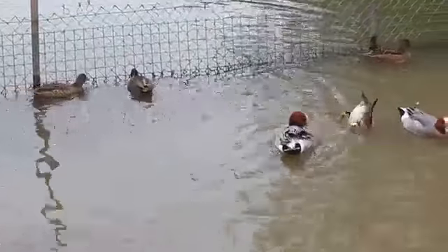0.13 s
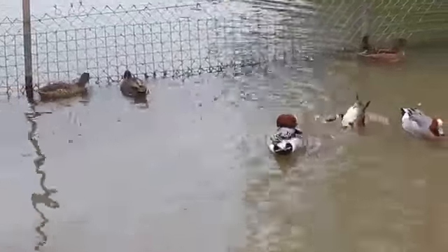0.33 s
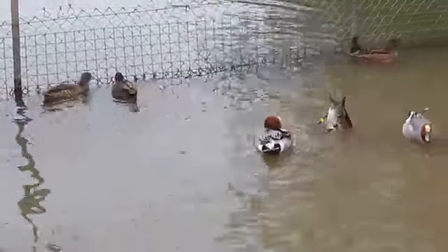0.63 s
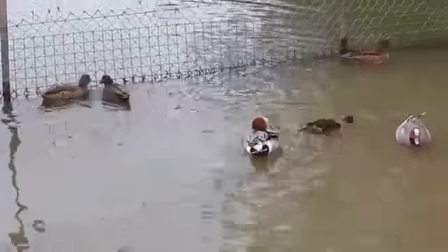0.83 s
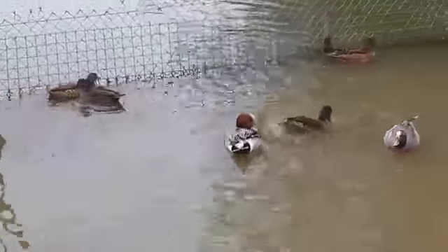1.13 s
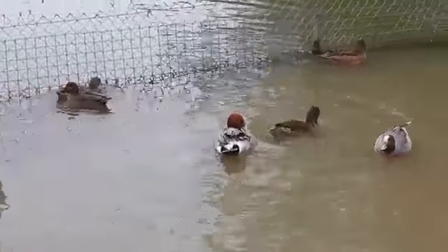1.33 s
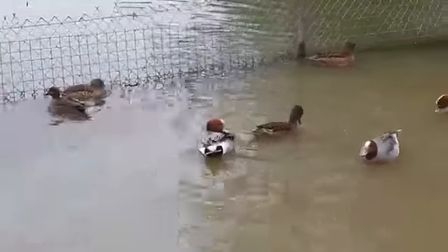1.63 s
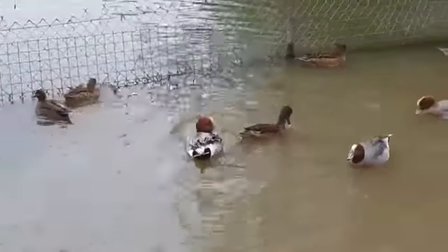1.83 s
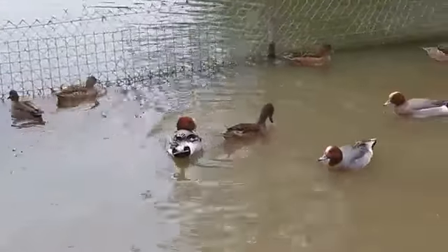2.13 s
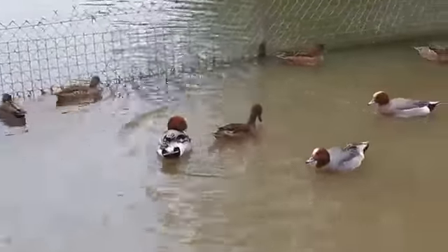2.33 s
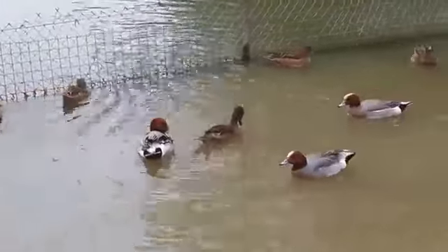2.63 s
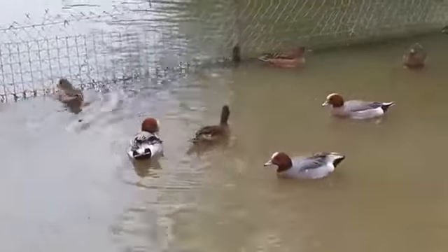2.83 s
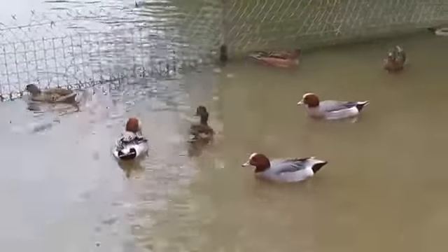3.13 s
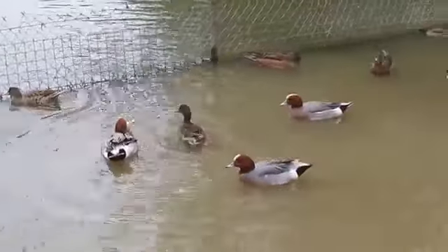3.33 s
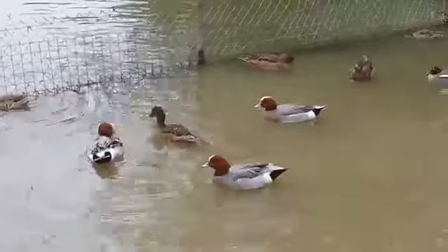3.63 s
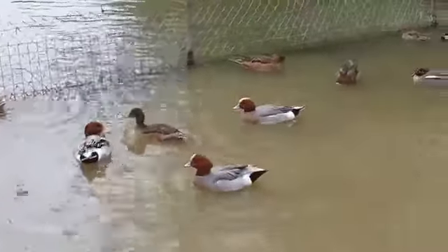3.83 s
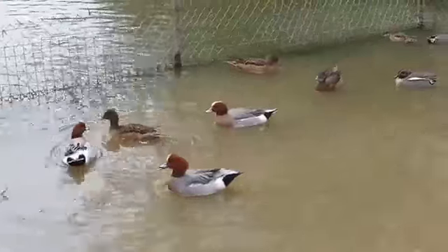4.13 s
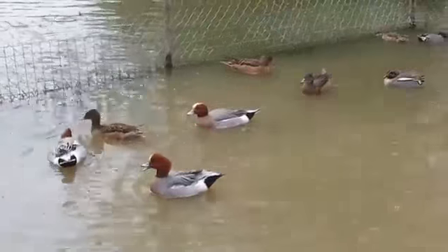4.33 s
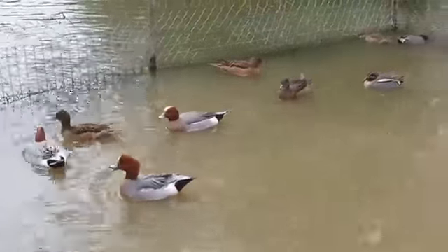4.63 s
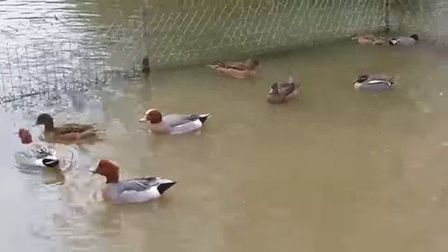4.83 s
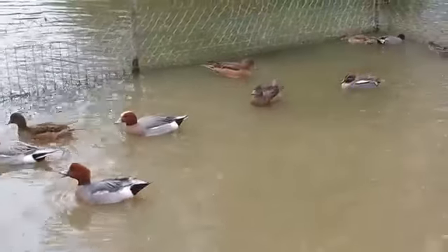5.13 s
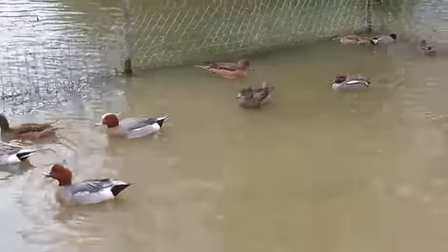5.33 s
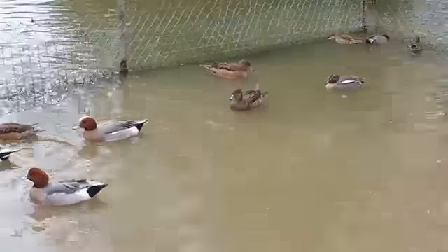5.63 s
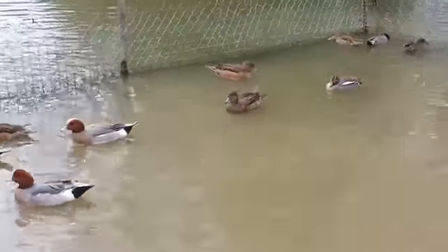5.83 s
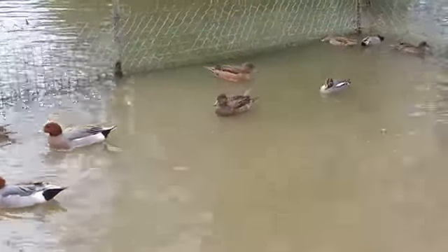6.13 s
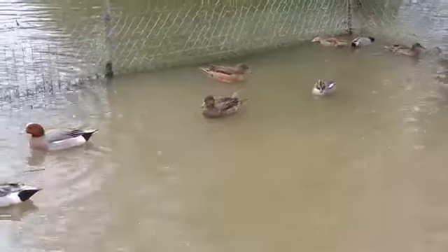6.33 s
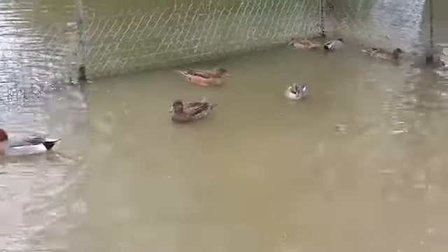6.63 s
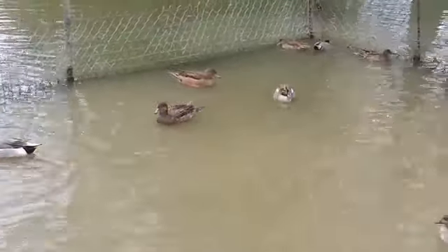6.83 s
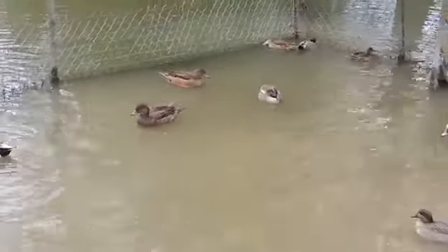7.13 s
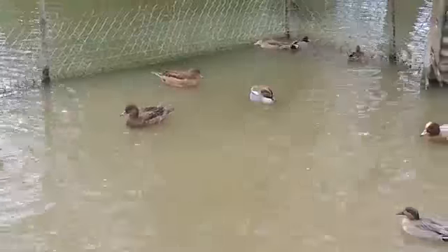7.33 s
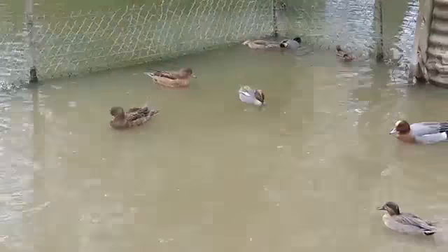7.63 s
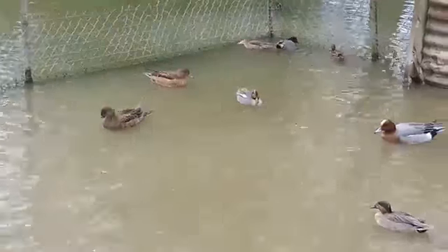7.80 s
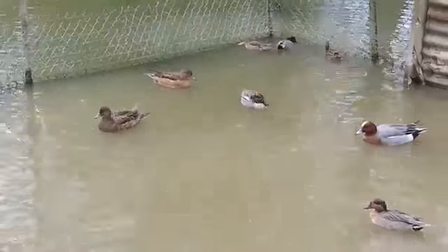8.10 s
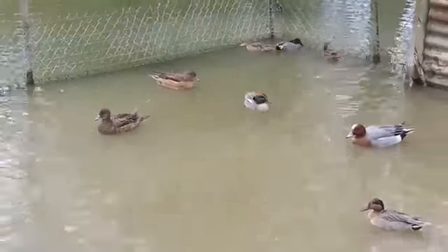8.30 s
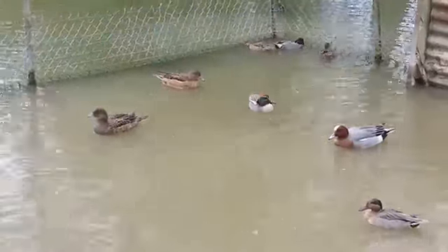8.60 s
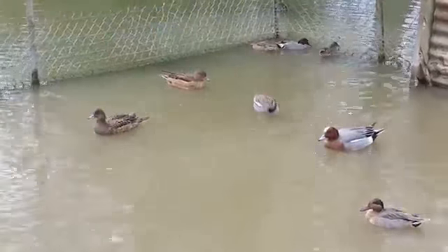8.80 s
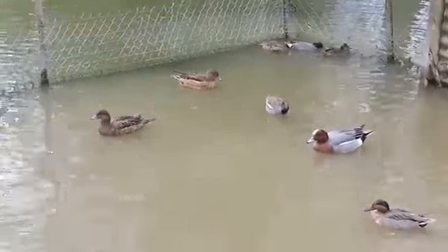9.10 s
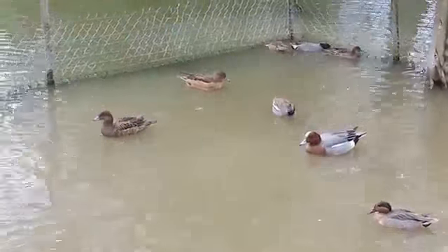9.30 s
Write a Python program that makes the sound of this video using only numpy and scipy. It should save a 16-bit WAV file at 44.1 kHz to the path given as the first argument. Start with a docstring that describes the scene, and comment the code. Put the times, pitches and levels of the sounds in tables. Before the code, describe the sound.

Outdoor pond ambience with soft hiss, hoarse duck grunts, one loud falling drake whistle around five seconds, and increasingly bright songbird phrases.

```python
"""Ducks on a shallow fenced pond, heard by a hand-held camera with two microphone ports, over noise hiss, leaves and traffic.
A dove coos in gliding tones and far birds twitter; ducks grunt in pulsed noise and a drake whistles up and down through a windpipe.
On the right a songbird sings gliding sine notes and a quick trill; water ticks in bright noise; then ducks growl in slow slaps.
A smaller bird chirps on the left, ducks whine upward in partials and a louder whistle breaks downward twice.
Later the songbird adds buzzing notes and quick falling sweeps; splashes plop as ringing air pockets. Banks and trees echo the animals."""
import sys
import numpy as np
from scipy import signal
from scipy.fft import rfft, irfft, next_fast_len
from scipy.io import wavfile
from scipy.ndimage import uniform_filter1d, map_coordinates

SR = 44100
rng = np.random.default_rng(int(sys.argv[2]) if len(sys.argv) > 2 else 0)


def master(y):
    """Save y as 16-bit WAV."""
    cut = np.clip(np.atleast_2d(y).T, -1, 1)
    pcm = np.round(cut * 32767)  # scale
    wavfile.write(sys.argv[1], SR, pcm.astype(np.int16))


N = 417186  # samples

# Levels in all tables are settings ahead of flutter and later gains.
# hiss and leaves, spectrum before levelling: (f/Hz, density/dB per Hz)
HISS_SPECTRUM = [(12, -58), (20, -8), (43, -24), (131, -7.5), (333, -0.5), (427, -0.5), (665, -3),
                 (925, -3.5), (1560, -5), (3880, -8.5), (4340, -8), (5870, -16.5), (10500, -13.5),
                 (13400, -15), (14600, -15)]
# mid-band blur of far birds and the whistle's echo, spectrum before levelling: (f/Hz, density/dB per Hz)
BLUR_SPECTRUM = [(600, -81), (1200, -18.5), (2000, -7.5), (3200, 3.5), (4600, -4.5), (5600, -6),
                 (6500, -20), (8000, -90)]
# background beds: (t/s, hiss level/dB, traffic level/dB, level of far birds and whistle echo/dB)
BED_LEVELS = [(0.0, -64.5, -65, -88), (0.58, -63, -63, -62), (0.81, -60, -68.5, -54),
              (2.63, -63.5, -62.5, -73), (4.19, -61.5, -69, -62), (5.13, -57.5, -96, -43),
              (5.29, -60, -106, -50.5), (6.9, -61, -68, -55), (8.9, -59.5, -96, -51), (9.46, -58, -80, -47)]
# likeness of left and right in the beds: (f/Hz, correlation)
STEREO_LIKENESS = [(60, -0.16), (290, 0.25), (640, 0.16), (1400, -0.34), (3000, 0.058)]
# decay of the echoes from banks and trees: (f/Hz, t60/s)
ECHO_DECAY = [(300, 0.14), (1500, 0.83), (3000, 0.5), (6000, 0.53), (12000, 0.36)]
# dove coos: (t/s, length/s, start f/Hz, end f/Hz, middle level/dB)
DOVE_COOS = [(0, 0.32, 475, 456, -71), (.84, .17, 439, 459, -59.5), (1.45, 0.36, 501, 460.6, -64.5),
             (1.98, 0.2, 483, 443, -63), (2.58, 0.15, 440, 433, -64.5), (2.94, 0.12, 416, 393, -68),
             (4.05, 0.16, 479, 476, -64.5), (4.28, 0.24, 477, 458, -62), (6.3, 0.12, 434, 433, -65)]
# duck grunts: (t/s, peak level/dB, length/s, bright part level/dB)
DUCK_GRUNTS = [(0.593, -45.5, 0.049, -6.5), (1.782, -51, 0.036, -9), (2.383, -49, 0.034, -8.5),
               (2.654, -50.5, 0.064, -13), (3.756, -43.5, 0.047, -15), (4.552, -37, 0.053, -7.5),
               (4.824, -33.5, 0.069, -7), (5.783, -41.5, 0.067, -8.5), (6.029, -45.5, 0.056, -7),
               (6.497, -36.5, 0.031, -19), (6.568, -49, 0.01, -19), (6.606, -45, 0.0089, -21),
               (7.315, -48, .015, -9), (7.477, -46.5, .012, 0), (7.794, -41.5, 0.046, -9),
               (7.86, -48.5, 0.079, -20), (8.156, -48.5, 0.027, -1), (8.297, -50, .015, 5),
               (8.333, -43.5, 0.088, -0.5), (8.878, -44, 0.031, -8), (9.272, -35.5, 0.054, -19.5),
               (9.38, -37.5, 0.015, 7), (9.384, -45, 0.018, 3), (9.417, -43, 0.036, -21)]
# resonances of throat, open bill and body: (f/Hz, width/Hz, level per pass/dB), passed twice
THROAT_MODES = [(520, 704, 1.5), (960, 550, 3.5), (1277, 235, 0.5)]
BILL_MODES = [(1378, 214, 1), (2300, 1360, -2.5)]
CHEST_MODES = [(244, 130, -4.5)]
# single gliding partials of duck whines, grunts and quacks, one list each: (t/s, f/Hz, level/dB)
DUCK_PARTIALS = [
    [(4.85, 1637, -42), (4.862, 1714, -44), (4.88, 1740, -43), (4.901, 1780, -35)],
    [(4.83, 414, -49.5), (4.869, 491, -41), (4.884, 550, -53)],
    [(8.326, 1560, -56), (8.344, 1590, -49), (8.41, 1430, -55), (8.43, 1350, -62)],
    [(.597, 960, -56), (.62, 987, -52), (.65, 995, -60)],
    [(8.487, 557, -63), (8.502, 540.0, -49), (8.52, 520.0, -54.5)],
]
# drake whistles, the louder breaking downward twice: (t/s, f/Hz, effort level/dB)
DRAKE_WHISTLES = [
    [(.7, 1154, -57), (.718, 1420, -54), (.743, 2590, -43), (.755, 2800, -41), (.779, 2880, -36),
     (.829, 2760, -38), (.865, 2560, -39), (.904, 1990, -46), (.961, 1290, -56), (1.03, 1120, -60),
     (1.099, 830, -60)],
    [(4.89, 960, -36), (4.92, 1246, -31), (4.936, 2050, -22), (4.945, 2610, -22), (4.969, 2850, -18),
     (4.999, 2820, -16), (5.035, 2670, -19), (5.069, 2550, -19), (5.075, 2200, -25), (5.138, 1790, -25),
     (5.145, 1450, -29), (5.2, 1185, -32), (5.25, 938, -44), (5.301, 778, -52), (5.4, 670, -48)],
]
# each whistler: (left port lag/us, pan/dB, echo level/dB, wall level/dB, octave partial level/dB, rasp/dB)
DRAKE_PLACES = [(-260, 11, 0, -1.5, -10, 2), (77.5, -3.5, -10.5, -4, -7.5, 2)]
# a drake's windpipe colours each partial that glides through it: (f/Hz, level/dB)
WINDPIPE_COLOUR = [(500, -9), (1000, -7), (1230, -3.5), (1450, -8.5), (1800, 0), (2250, -8.5), (2550, -1.5),
                   (2850, 1), (3200, -5), (3600, -2.5), (4150, 12), (4600, 3.5), (5000, -4.5),
                   (5700, -11.5)]
# air in a whistle, spectrum before levelling: (f/Hz, density/dB per Hz)
BREATH_SPECTRUM = [(250, -90), (700, -24), (1500, -29), (2800, 6), (4500, -5), (6000, -13), (7500, -11),
                   (10000, -14), (11500, -31), (14000, -42)]
# songbird notes: (t/s, glide/s, tail/s, start f/Hz, turn f/Hz, end f/Hz, turn level/dB, swell to turn/dB)
SONG_NOTES = [(1.356, 0.068, 0.043, 3300, 2170, 3020, -63, -2),
              (1.667, .02, 0.027, 2660, 3580, 2350, -47.5, 6),
              (1.952, .02, .012, 3260, 3190, 3150, -55, 14), (1.996, 0.03, .04, 3420, 3620, 3080, -58, 1),
              (2.302, 0.032, 0.024, 3740, 3190, 3120, -52, 13),
              (2.562, 0.061, 0.13, 2690, 2766, 2860, -64.5, -4),
              (3.072, 0.014, 0.05, 4100, 4400, 4290, -56, 4),
              (3.166, 0.034, 0.11, 5300, 4200, 3170, -52, 15),
              (3.374, .01, 0.024, 3070, 3060, 2550, -53, 1),
              (3.426, 0.036, .088, 2680, 2680, 2760, -59.5, 9),
              (3.768, .006, 0.026, 3220, 3140, 2810, -57.5, 6),
              (3.878, .03, .014, 2480, 2650, 2730, -60, 6),
              (3.936, 0.017, 0.058, 4335, 3680, 3550, -52, -4),
              (4.216, 0.012, 0.12, 4110, 3400, 2530, -52, -4),
              (4.353, 0.055, 0.081, 2920, 3200, 3220, -48.5, 4),
              (4.618, 0.014, 0.027, 4220, 4220, 4200, -42.5, -2),
              (4.666, 0.036, .054, 3820, 3550, 3930, -49.5, 1),
              (4.858, .014, .01, 4050, 4250, 4250, -41.5, -12),
              (5.277, .01, 0.039, 4230, 4270, 4510, -43.5, -7),
              (5.378, 0.015, 0.02, 5100, 5560, 5550, -50.5, 0),
              (5.508, .022, 0.07, 4730, 4470, 4295, -44, 6),
              (5.596, 0.019, .01, 4330, 3330, 3090, -63, -25),
              (5.69, 0.067, 0.014, 2640, 3220, 3250, -41, 20),
              (5.775, 0.034, .077, 3250, 3132, 3224, -42, 2),
              (5.952, 0.049, 0.074, 2870, 3170, 3104, -39, 10),
              (6.17, 0.16, 0.11, 2080, 2504, 2470, -59, -5.5),
              (6.276, .006, .03, 3700, 3800, 2550, -57, -1),
              (6.446, .006, .05, 3200, 3200, 3000, -61.5, -8),
              (6.71, .008, 0.034, 2360, 2450, 3530, -53, -4),
              (7.066, 0.0031, 0.027, 3360, 3500, 2120, -45, 0),
              (7.261, 0.015, 0.017, 3040, 3460, 3000, -47, 1),
              (7.401, 0.074, .004, 7330, 5500, 5300, -46, 11),
              (7.475, 0.012, 0.0086, 5270, 3940, 3850, -36, -1.5),
              (7.602, .014, 0.011, 3830, 2760, 2590, -52, 5),
              (7.642, 0.027, 0.022, 3180, 3670, 4000, -45, -2.5),
              (7.818, 0.0091, 0.011, 3260, 3320, 2850, -40.5, 2),
              (7.84, 0.0116, 0.052, 2830, 3650, 3840, -33, 16),
              (7.875, 0.0053, 0.072, 5530, 4800, 4757, -30, 27),
              (7.957, 0.042, 0.044, 3476, 3245, 3070, -30.5, 7),
              (8.127, 0.014, 0.022, 3333, 2994, 2250, -40, -5),
              (8.187, 0.02, .042, 2660, 3000, 2967, -37, 7),
              (8.288, 0.023, 0.0094, 4920, 4280, 4390, -38.5, -5.5),
              (8.318, 0.029, 0.02, 4400, 4540, 4600, -44, 32),
              (8.385, 0.023, 0.027, 4440, 3834, 3650, -31, 0),
              (8.565, .006, 0.011, 3190, 3400, 3050, -36, 4),
              (8.583, .014, 0.023, 3010, 3710, 3830, -27.5, 13),
              (8.613, 0.0069, 0.06, 5700, 4855, 4820, -30.5, 21),
              (8.701, .042, 0.042, 3510, 3280, 3030, -28.5, 7),
              (8.886, 0.019, .004, 3680, 3410, 3420, -32.5, 0.5),
              (8.904, 0.054, 0.03, 3370, 3665, 4100, -26.5, 9.5),
              (9.126, 0.019, 0.041, 4950, 4430, 4710, -36.5, -1),
              (9.321, .006, 0.011, 3560, 3620, 3290, -31.5, 5),
              (9.339, 0.041, 0.022, 3340, 3650, 3600, -22.5, 14.5),
              (9.433, .008, .016, 5570, 4420, 3640, -44, 1)]
# the camera turns: (t/s, left port lag behind right/us)
SONG_LAGS = [(0, 400), (6.2, 380), (7, 336), (9.46, 280)]
# thin ticks of water: (t/s, peak level/dB, pan/dB)
WATER_TICKS = [(1.5733, -47, -2), (2.2473, -46, 1), (5.8292, -44, -1), (7.1472, -49, 0.0),
               (7.3118, -45, -3), (7.7194, -44, -3), (9.3871, -43.5, -10)]
# the songbird's run of alike notes: (t/s, level/dB)
TRILL_TIMES = [(1.785, -58), (1.87, -58), (1.959, -57), (2.036, -57), (2.128, -56), (2.227, -55.5),
               (2.306, -55), (2.407, -57.5)]
# the shape they share: (glide/s, tail/s, start f/Hz, turn f/Hz, end f/Hz)
TRILL_SHAPE = (.016, .045, 2250, 2420, 2600)
# duck growls: (t/s, swell/s, fade/s, peak level/dB)
DUCK_GROWLS = [(3.29, 0.036, 0.061, -48.5), (3.34, 0.41, .15, -47.5), (3.94, 0.0091, .01, -52.5),
               (5.12, 0.086, 0.19, -47), (6.96, .03, 0.12, -59.5), (7.17, 0.053, 0.014, -55),
               (7.27, 0.049, 0.027, -57.5), (8.6, 0.061, .27, -52), (8.95, 0.12, .07, -46.5),
               (9.1, .27, .09, -45)]
# mostly falling chirps on the left: (t/s, glide/s, tail/s, start f/Hz, turn f/Hz, end f/Hz,
# turn level/dB, swell to turn/dB)
LEFT_CHIRPS = [(3.814, .012, 0.066, 5010, 4050, 4010, -60, -6),
               (4.172, 0.015, 0.047, 5870, 5420, 5620, -56, 1),
               (4.512, 0.011, 0.066, 5070, 3980, 3900, -49, -0.5),
               (4.88, .012, .03, 4780, 4720, 4710, -42, -1),
               (5.547, 0.014, 0.038, 6950, 5520, 5570, -47.5, 8.5),
               (5.893, 0.015, 0.055, 6900, 5630, 5630, -53, 8),
               (5.94, 0.016, .003, 5020, 3260, 3300, -54, -6),
               (6.24, .016, 0.084, 6200, 3950, 3890, -56, 6),
               (6.362, .008, 0.02, 4850, 4550, 4050, -54, 12),
               (6.604, .012, 0.082, 5120, 4700, 4530, -50.5, -1),
               (6.938, .024, .02, 6500, 5590, 5470, -59, 6),
               (6.985, 0.014, 0.014, 5400, 3800, 3400, -54.5, 1),
               (7.025, 0.022, 0.018, 3300, 3160, 3210, -41, 16),
               (7.216, 0.0077, .003, 5360, 4150, 4150, -51, -6),
               (7.294, 0.015, 0.041, 5100, 4610, 4650, -43.5, 2),
               (7.35, 0.0102, .022, 4670, 4440, 3980, -46.5, 6),
               (7.642, 0.018, 0.033, 4820, 3790, 3880, -44.5, 3),
               (7.766, 0.0086, .01, 4570, 4130, 3880, -51, -3), (8.0, 0.007, .03, 4960, 4670, 4760, -43, 2),
               (8.034, 0.014, 0.022, 4770, 4710, 4200, -40, 19),
               (8.726, .02, .004, 4970, 3750, 3650, -51, -10), (8.756, .01, 0.05, 4820, 4830, 4800, -50, 0),
               (9.062, .014, .034, 5020, 4620, 4700, -40, 9)]
# rising nasal whines, one list each: (t/s, f/Hz, effort level/dB)
DUCK_WHINES = [
    [(4.32, 448, -60), (4.362, 538, -53), (4.43, 604, -55), (4.545, 685, -54.5), (4.59, 696.5, -47),
     (4.629, 741, -49)],
    [(4.71, 520, -65.5), (4.773, 578, -46.5), (4.81, 658, -59), (4.839, 682, -46)],
]
# whine partials from the fundamental up: (level/dB)
WHINE_PARTIALS = [-1.5, 4.5, -0.5, 3]
# buzzing notes, and quick falling sweeps that open two song notes:
# (t/s, length/s, start f/Hz, end f/Hz, swing/Hz, swing rate/Hz, level/dB)
SWINGING_NOTES = [(7.264, 0.026, 3240, 3294, 280, 127, -44), (7.868, 0.0099, 8200, 5500, 300, 360, -50),
                  (8.608, 0.014, 8300, 5430, 300, 450, -54), (9.035, 0.025, 5220, 5750, 495, 184, -39)]
# air pockets ringing in a splash, one list each: (t/s, f/Hz, level/dB)
SPLASH_POCKETS = [
    [(9.38, 1430, -45), (9.39, 1350, -52)],
    [(9.388, 1054, -43), (9.402, 847, -41), (9.432, 800, -56)],
    [(9.39, 520, -47), (9.41, 414, -43.5)],
    [(9.394, 2300, -39), (9.406, 2180, -41)],
    [(9.41, 1660, -54), (9.43, 2150, -60)],
]

TOP_HZ = 14530  # the camera's band limit
SONG_FADE_DB, TRILL_FADE_DB, CHIRP_FADE_DB = 9.5, 10, 12  # drop over each note's tail
COO_EDGE_DB = 4  # softer at both ends
GROWL_RATE_HZ, GROWL_EDGE_DB, RASP_S = 42, 7, .012


def amp(db):
    """Decibels to a linear gain."""
    return 10 ** (np.asarray(db) / 20)


def unit(x):
    """Levels x to an rms of 1."""
    return x / np.sqrt(np.mean(x ** 2) + 1e-20)


def along(points, hz):
    """Reads (f/Hz, value) points on a log frequency axis."""
    f, v = np.transpose(points)
    return np.interp(np.log(hz + 1), np.log(f + 1), v)


def curves(rows, t):
    """Reads each column after the time at times t."""
    s, *cols = np.transpose(rows)
    return [np.interp(t, s, c) for c in cols]


def wobble(rate, size=N):
    """A smooth random curve with rate knots a second."""
    knots = rng.standard_normal(int(size * rate / SR) + 4)
    return map_coordinates(knots, [np.arange(size) * rate / SR])


def filtered(x, response):
    """Multiplies the spectrum of x by a complex response of frequency."""
    m = next_fast_len(N + SR // 2)
    return irfft(rfft(x, m) * response(np.fft.rfftfreq(m, 1 / SR)), m)[..., :N]


def resonant(x, modes):
    """Sends x twice through causal resonances, so that their skirts are steep."""
    def response(f):
        total = 0
        for k, (centre, width, db) in enumerate(modes):
            band = 1j * f * width / (centre * centre - f * f + 1j * f * width)
            total = total + (-1) ** k * amp(db) * band  # neighbours in opposite polarity
        return total ** 2
    return filtered(x, response)


def span(rows, fade):
    """Sample range, times and soft-edged gate of one call."""
    start, end = rows[0][0], rows[-1][0]
    i = np.arange(max(0, round((start - fade) * SR)), min(N, round((end + fade) * SR)))
    t = i / SR
    gate = np.clip(np.minimum(t - start, end - t) / fade + 1, 0, 1) ** 2
    return i, t, gate


def tones(calls, fade, flutter_db, flutter_rate, drift):
    """Gliding harmonic partials whose levels flutter and whose pitch drifts at random."""
    out = np.zeros(N)
    for rows in calls:
        i, t, gate = span(rows, fade)
        hz, *levels = curves(rows, t)
        phase = 2 * np.pi * np.cumsum(hz * (1 + drift * wobble(88.9, len(i)))) / SR
        stack = 0
        for k, db in enumerate(levels):
            gain = amp(db + flutter_db * wobble(flutter_rate, len(i)))
            stack = stack + gain * np.sin((k + 1) * phase)
        out[i] += np.sqrt(2) * gate * stack
    return out


def notes(table, fade_db):
    """Each note glides and swells to a turn, then tails off."""
    calls = []
    for s, glide, tail, start_hz, turn_hz, end_hz, db, swell_db in table:
        turn = s + glide
        calls.append([(s, start_hz, db - swell_db), (turn, turn_hz, db), (turn + tail, end_hz, db - fade_db)])
    return calls


def piped(rows, partials_db):
    """Effort plus the windpipe's colour gives the level of each partial, every 2 ms."""
    t = np.arange(rows[0][0], rows[-1][0], .002)
    hz, effort_db = curves(rows, t)
    levels = [effort_db + db + along(WINDPIPE_COLOUR, (k + 1) * hz) for k, db in enumerate(partials_db)]
    return np.transpose([t, hz] + levels)


def pulses(rate, jitter, scatter_db):
    """Vocal folds slap at an uneven rate, each slap of its own strength."""
    count = np.cumsum(rate * (1 + jitter * wobble(120)).clip(0)) / SR
    slap = np.diff(np.floor(count), prepend=0) > 0
    strength = amp(scatter_db * np.sin(2 * np.pi * rng.random(N)))
    return slap * strength * np.sqrt(SR / np.maximum(rate, 1))


def ports(x, lag_us, pan_db):
    """Places a source by arrival and level: positive lag delays the left port, positive pan favours it."""
    shifts = np.multiply.outer([-.5, .5], lag_us * np.ones(N)) * 1e-6 * SR
    pair = np.array([map_coordinates(x, [np.arange(N) + shift]) for shift in shifts])
    return pair * amp([[pan_db / 2], [-pan_db / 2]])


def echoes(x):
    """Banks and trees answer as a noise tail; each frequency dies at its own speed."""
    hz, t, z = signal.stft(rng.standard_normal((2, SR)), SR, nperseg=256)
    decay = amp(-60 * t / along(ECHO_DECAY, hz)[:, None])
    tail = signal.istft(z * decay, SR, nperseg=256)[1]
    late = np.pad(x, (400, 0))[None]  # about 9 ms before the first answer
    return signal.fftconvolve(late, tail / np.linalg.norm(tail[0]), axes=1)[:, :N]


def rush(spectrum, patchy_db):
    """Stereo noise of rms 1 with time-frequency patches of random gain."""
    z = signal.stft(rng.standard_normal((2, N)), nperseg=512)[2]
    field = uniform_filter1d(uniform_filter1d(rng.standard_normal(z.shape[1:]), 6, 0), 14, 1)
    pair = signal.istft(z * amp(patchy_db * unit(field)), nperseg=512)[1][:, :N]

    def mid_side(hz):
        turn = np.arccos(np.clip(along(STEREO_LIKENESS, hz), -1, 1)) / 2
        return amp(along(spectrum, hz)) * [np.cos(turn), np.sin(turn)]
    mid, side = filtered(pair, mid_side)
    return unit(np.array([mid + side, mid - side]))


def air():
    """Noise beds: hiss with leaves, traffic that swells, a mid-band blur of far birds and the whistle's echo."""
    hiss_db, traffic_db, blur_db = curves(BED_LEVELS, np.arange(N) / SR)
    # (f/Hz, density/dB per Hz)
    traffic_spectrum = [(20, -37), (60, -14), (130, -10.5), (300, -15), (600, -58), (900, -93)]
    traffic = amp(traffic_db - 3 + 1.7 * wobble(3.25)) * rush(traffic_spectrum, patchy_db=1.0)
    blur = amp(blur_db - 2 + 1.5 * wobble(7.3)) * rush(BLUR_SPECTRUM, patchy_db=3.0)
    hiss = amp(hiss_db + 7.5 + 0.17 * wobble(11)) * rush(HISS_SPECTRUM, patchy_db=2.0)
    return hiss + traffic + blur


def twitter(count):
    """Faint far birds: short sine glides at chance times and pitches, from either side, wet with echo."""
    sides = [[], []]
    for when, pitch, glide, length, loud, side in rng.random((count, 6)):
        s, hz, db = when * (N / SR - .1), 2600 * 2 ** pitch, -77 + 4 * loud
        end = s + 0.0204 + .06 * length
        sides[int(side >= .5)].append([(s, hz, db), (end, hz * (.72 + 0.44 * glide), db - 2)])
    left, right = (tones(calls, .005, flutter_db=5.0, flutter_rate=126, drift=0.007) for calls in sides)
    return ports(left, -200, 1.5) + ports(right, 240, -1.5) + echoes(amp(7.5) * (left + right))


def dove():
    """Low gliding sine coos that swell to the middle and soften again."""
    coos = []
    for s, length, start_hz, end_hz, db in DOVE_COOS:
        middle = (s + length / 2, (start_hz + end_hz) / 2, db)
        coos.append([(s, start_hz, db - COO_EDGE_DB), middle, (s + length, end_hz, db - COO_EDGE_DB)])
    return tones(coos, 0.044, flutter_db=-0.5, flutter_rate=26.5, drift=0.0074)


def grunts():
    """Short hoarse bursts of fast uneven slaps and breath; a wider bill adds a brighter part."""
    low, high = np.zeros(N), np.zeros(N)
    for s, db, length, bright_db in DUCK_GRUNTS:
        length = max(length, .01)
        i, t, gate = span([(s + 0.0032,), (s + length,)], 0.011)
        shape = gate * amp(db - 5 * (t - s) / length)
        low[i] += shape
        high[i] += shape * amp(bright_db)
    source = pulses(np.full(N, 170.), jitter=.3, scatter_db=1.5) + 1.1 * rng.standard_normal(N)
    throat = amp(4.5) * resonant(low * source, THROAT_MODES)
    bill = amp(7) * resonant(high * source, BILL_MODES)
    return throat + bill + resonant(low * source, CHEST_MODES)


def pond_tones(calls):
    """The fluttering, drifting tone shared by lone duck partials, whines and plops."""
    return tones(calls, .01, flutter_db=3.0, flutter_rate=120, drift=0.0172)


def lone_partials():
    """Single gliding partials of duck whines, grunts and quacks."""
    return pond_tones(DUCK_PARTIALS)


def whistle(rows, lag_us, pan_db, echo_db, wall_db, octave_db, rasp_db):
    """A rasping tone and its octave, with air hissing as hard as the drake blows; a wall returns it 13 ms later."""
    tone = tones([piped(rows, [0, octave_db])], .008, flutter_db=rasp_db, flutter_rate=110, drift=0.0086)
    blow = np.sqrt(np.abs(uniform_filter1d(tone ** 2, size=400)))
    breath = unit(filtered(rng.standard_normal(N), lambda hz: amp(along(BREATH_SPECTRUM, hz))))
    call = tone + amp(-14.5) * blow * breath

    def wall(hz):
        return amp(wall_db) * np.exp(-2j * np.pi * hz * 0.013) / (1 + (hz / 3500) ** 4)
    back = filtered(call, wall)
    return ports(call, lag_us, pan_db) + ports(back, 167, -1.6) + echoes(amp(echo_db) * call)


def song():
    """Pure notes that glide through a turn in pitch."""
    return tones(notes(SONG_NOTES, SONG_FADE_DB), 0.0033, flutter_db=2.0, flutter_rate=157, drift=0.004)


def drips():
    """High-passed noise ticks that die by 60 dB in 44 ms."""
    out, t = np.zeros((2, N + SR)), np.arange(SR // 20) / SR
    for s, db, pan_db in WATER_TICKS:
        gain = amp([[db + pan_db / 2], [db - pan_db / 2]])
        tick = gain * amp(-0.5 - 60 * t / 0.044) * rng.standard_normal((2, len(t)))
        out[:, round(s * SR):][:, :len(t)] += tick
    return filtered(out[:, :N], lambda hz: (1j * hz / (2500 + 1j * hz)) ** 2)


def trill():
    """A run of upward sine glides of one shape."""
    table = [(s, *TRILL_SHAPE, db, 2) for s, db in TRILL_TIMES]
    return amp(-4) * tones(notes(table, TRILL_FADE_DB), .005, flutter_db=5, flutter_rate=146, drift=0.007)


def growls():
    """Slow slaps, each followed by a short rasp of air that rings the throat, with some breath between."""
    level = np.zeros(N)
    for s, swell, fade, db in DUCK_GROWLS:
        peak = s + swell
        rows = [(s, db - GROWL_EDGE_DB), (peak, db), (peak + fade, db - GROWL_EDGE_DB)]
        i, t, gate = span(rows, 0.031)
        level[i] = np.maximum(level[i], gate * amp(curves(rows, t)[0]))
    slaps = pulses(np.full(N, GROWL_RATE_HZ), jitter=.12, scatter_db=3)
    rasp = unit(signal.fftconvolve(slaps, np.hanning(round(RASP_S * SR)))[:N])
    source = level * (.35 * slaps + (.95 * rasp + .35) * rng.standard_normal(N))
    return amp(8.5) * resonant(source, THROAT_MODES) + amp(-1) * resonant(source, BILL_MODES)


def chirps():
    """A smaller bird's quick sine glides."""
    return tones(notes(LEFT_CHIRPS, CHIRP_FADE_DB), .003, flutter_db=3.5, flutter_rate=172, drift=0.0038)


def whines():
    """Rising harmonic partials coloured by the windpipe."""
    return pond_tones([piped(rows, WHINE_PARTIALS) for rows in DUCK_WHINES])


def swinging_notes():
    """Sines of fast-swinging pitch: buzzing notes, and quick falling sweeps that open two song notes."""
    out = np.zeros(N)
    for s, length, start_hz, end_hz, swing_hz, rate, db in SWINGING_NOTES:
        i, t, gate = span([(s,), (s + length,)], .003)
        swing = swing_hz * np.sin(2 * np.pi * rate * (t - s))
        hz = np.interp(t, [s, s + length], [start_hz, end_hz]) + swing
        out[i] += np.sqrt(2) * amp(db) * gate * np.sin(2 * np.pi * np.cumsum(hz) / SR)
    return out


def plops():
    """Air pockets in a splash ring as short gliding tones."""
    return pond_tones(SPLASH_POCKETS)


def scene():
    """Places the animals and water between the ports and adds echoes and background."""
    songbird, run, chirping = song() + swinging_notes(), trill(), chirps()
    pond = growls() + grunts() + whines() + lone_partials() + plops()
    cooing = dove()
    drakes = sum(whistle(rows, *place) for rows, place in zip(DRAKE_WHISTLES, DRAKE_PLACES))
    lag_us, = curves(SONG_LAGS, np.arange(N) / SR)
    near = amp(1.0) * ports(songbird + run, lag_us, -0.69) + amp(1.0) * ports(chirping, -285, .6)
    near = near + ports(pond, 108, 0.18) + ports(cooing, 60, .2)
    # the trill is sung farther off, so wetter
    bird_echoes = echoes(amp(-2.5) * songbird + amp(-3.5) * chirping + amp(0.5) * run)
    pond_echoes = echoes(amp(-7.5) * pond + amp(-9.0) * cooing)
    return near + drakes + bird_echoes + pond_echoes + air() + drips() + twitter(count=110)


def record(dry):
    """The camera keeps nothing above its band limit."""
    return filtered(dry, lambda hz: hz < TOP_HZ)


dry = scene()
out = record(dry)
master(out)
```